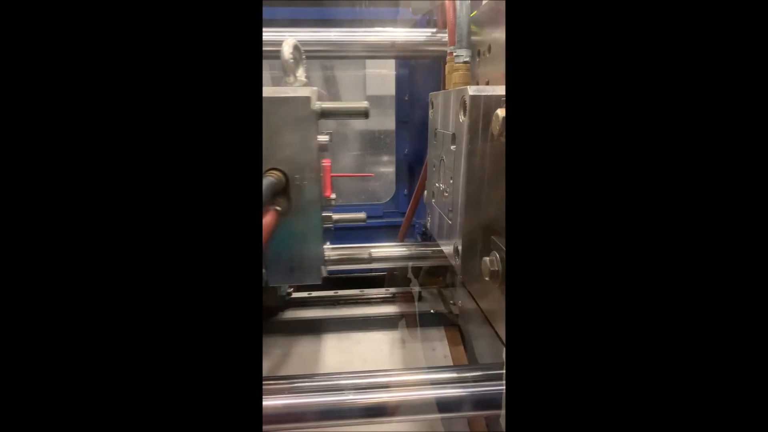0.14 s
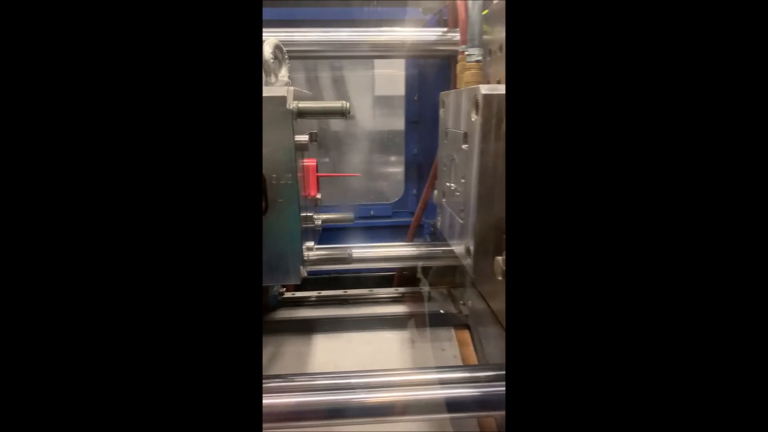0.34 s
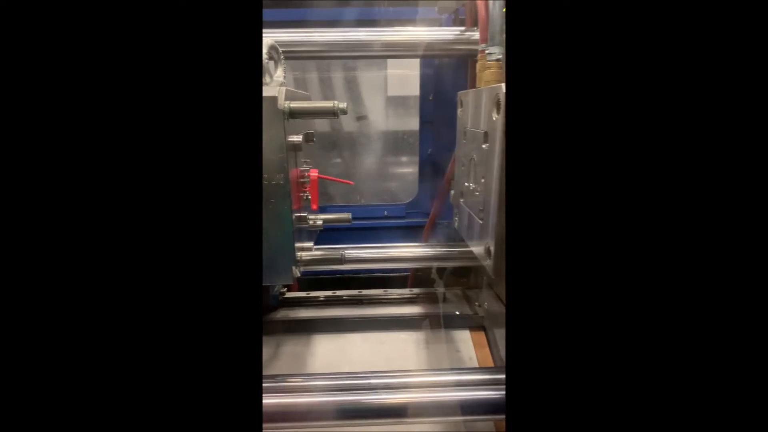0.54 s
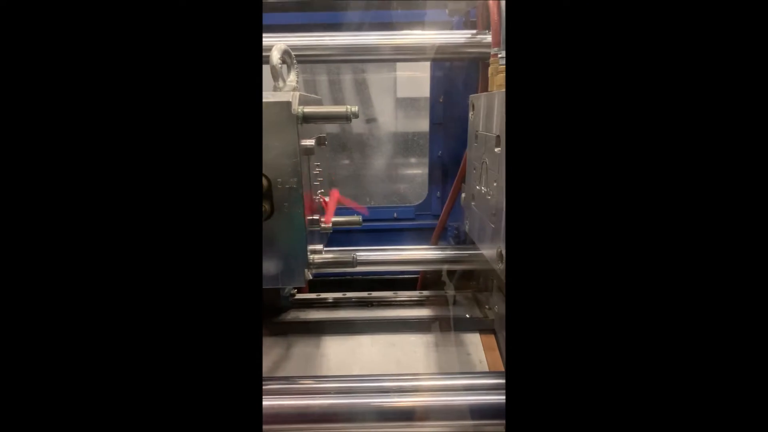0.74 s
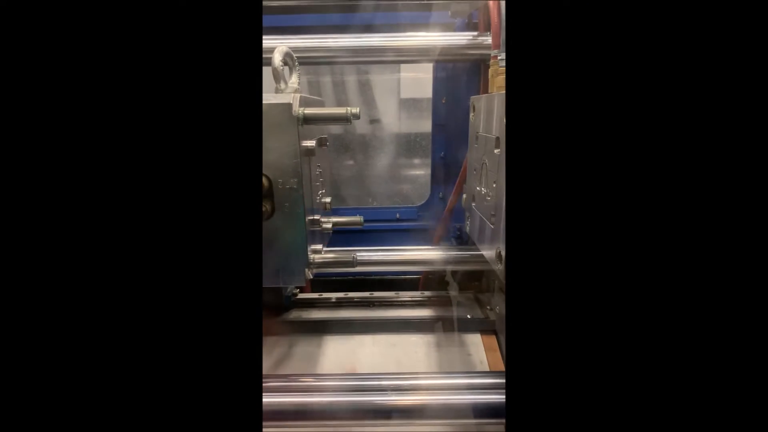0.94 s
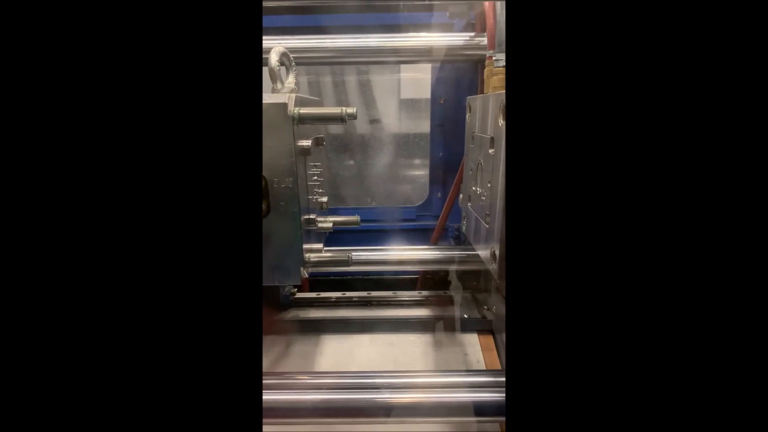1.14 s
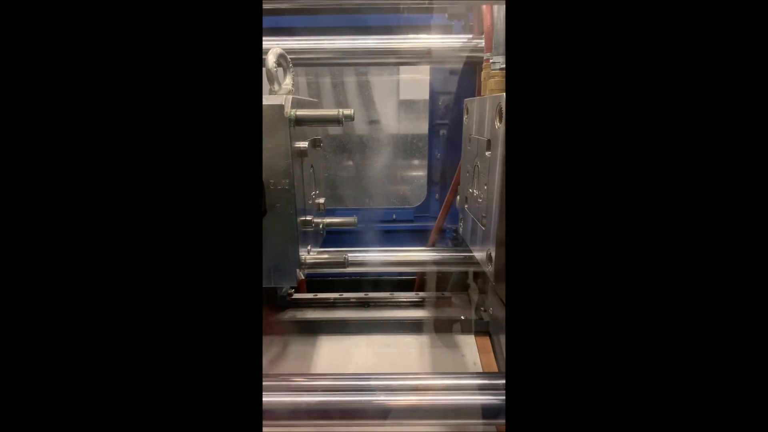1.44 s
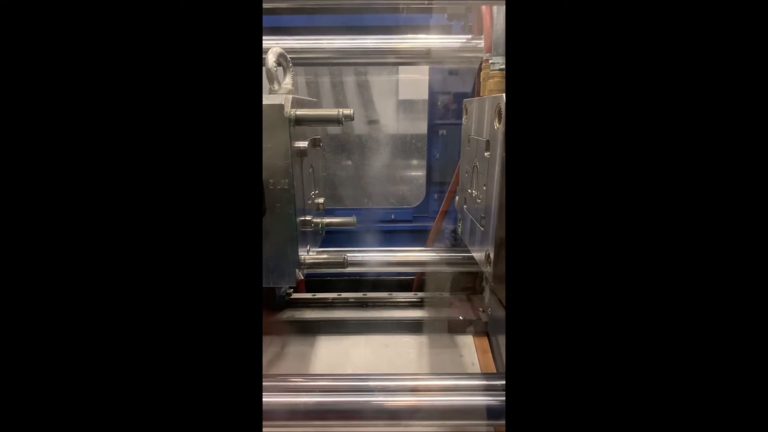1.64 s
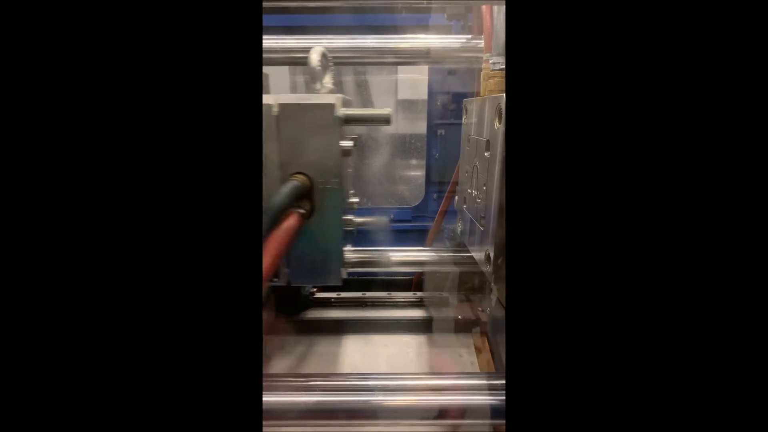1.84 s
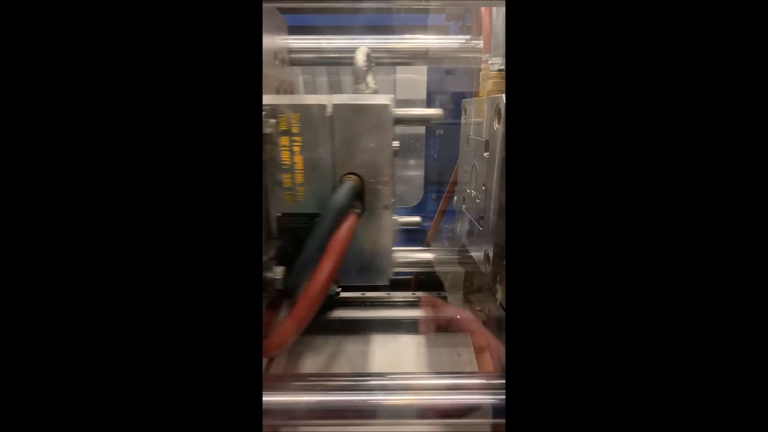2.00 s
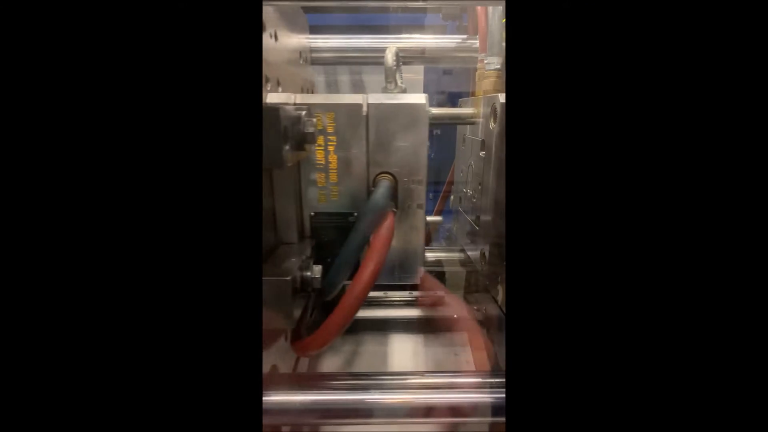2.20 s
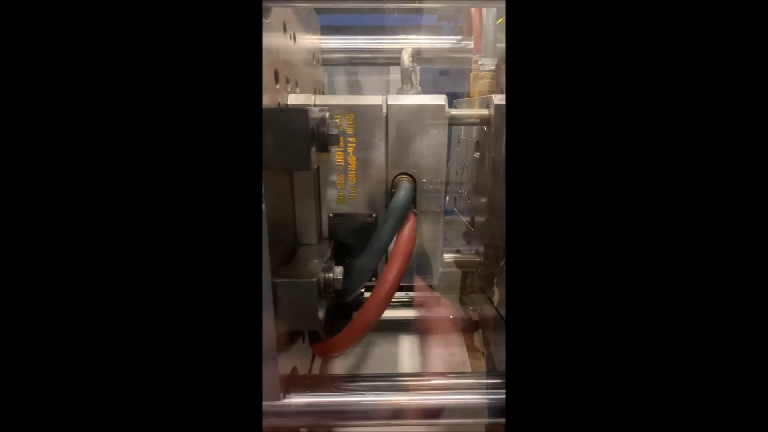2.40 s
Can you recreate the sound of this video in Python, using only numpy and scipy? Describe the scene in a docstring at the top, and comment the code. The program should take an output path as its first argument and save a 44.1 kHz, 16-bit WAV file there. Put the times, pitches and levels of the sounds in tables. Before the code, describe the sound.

Close stereo sound from just outside the guard: steady hydraulic hum, rumble and high beating whine, a few isolated metallic knocks, light rattling, then a dense run of hard clacks and ticks, ending in dull thumps.

```python
"""An injection moulding machine on a factory floor, heard in stereo from just outside its guard.
Throughout, pump and shaft sines hum, overtones whine and beat, and noise bands make rumble, oil flow and hiss.
First the open mould, its part ejected, knocks once: clicks ring its modes and a dense crack of noise.
More knocks follow with a light rattle of noise grains, then the clamp takes up its slack in a quick run
of steel clacks, pin ticks and short swelling notes, and slides shut with a few dull knocks."""
import sys
import numpy as np
from scipy import signal
from scipy.fft import rfft, irfft, next_fast_len
from scipy.io import wavfile

SR = 44100
rng = np.random.default_rng(int(sys.argv[2]) if len(sys.argv) > 2 else 0)


def store_pcm(level_fs):
    """Save levels as 16-bit WAV."""
    pcm = np.round(np.clip(level_fs, -1, 1) * 32767).astype(np.int16)
    wavfile.write(sys.argv[1], SR, np.atleast_2d(pcm).T)


N = 112896
TIME = np.arange(N) / SR  # seconds


def from_db(db):
    """Turn decibels into an amplitude gain."""
    return 10 ** (np.asarray(db) / 20)


def in_time(rows):
    """Draw each column of a table as straight lines between its times."""
    seconds, *columns = np.transpose(rows)
    return [np.interp(TIME, seconds, column) for column in columns]


def at_hz(points, hz):
    """Read a spectrum on a log-frequency axis."""
    point_hz, value = np.transpose(points)
    return np.interp(np.log(hz), np.log(point_hz), value)


def blend(zones_hz, columns, hz):
    """Crossfade the columns of neighbouring frequency zones on a log-frequency axis."""
    total = 0
    for one_zone, column in zip(np.eye(len(columns)), columns):
        weight = np.interp(np.log(hz), np.log(zones_hz), one_zone)
        total = total + weight * column
    return total


def drift(rate_hz):
    """Slow random wander of spread 1: noise through two equal low-pass poles, one step per 100 samples."""
    pole = np.exp(-200 * np.pi * rate_hz / SR)
    steps = rng.standard_normal(N // 100 + 1002)
    slow = signal.lfilter([1], [1, -2 * pole, pole * pole], steps)[1000:]  # drop the filter's start
    slow = (slow - slow.mean()) / slow.std()
    return np.interp(np.arange(N) / 100, np.arange(len(slow)), slow)


def bandpass(x, edges_hz):
    """Keep only what lies between two band edges."""
    return signal.sosfilt(signal.butter(2, edges_hz, "band", fs=SR, output="sos"), x)


def clicks(seconds, heights):
    """Place single-sample impulses at the given times."""
    out = np.full(N, 1e-18)
    np.add.at(out, (seconds * SR).astype(int), heights)
    return out


def ring(x, hz, t60):
    """A damped resonance: a unit click starts a sine of height 1 that falls 60 dB in t60 seconds."""
    radius = from_db(-60 / (t60 * SR))
    angle = 2 * np.pi * hz / SR
    return signal.lfilter([0, np.sin(angle)], [1, -2 * radius * np.cos(angle), radius * radius], x)


def fade(power, t60):
    """Energy that falls 60 dB in t60 seconds after each impulse of power."""
    return signal.lfilter([1], [1, -from_db(-120 / (t60 * SR))], power)


def swell(start, hz, db, rise):
    """A sine whose envelope peaks after its rise time and then dies away."""
    age = np.maximum(TIME - start, 0)
    envelope = (age / rise * np.exp(1 - age / rise)) ** 2
    return from_db(db) * envelope * np.sin(2 * np.pi * hz * age)


def tone(hz, db, lead, wander):
    """A stereo sine of given RMS level; its phase wanders and the left leads by some radians."""
    phase = 2 * np.pi * (hz * TIME + rng.random()) + wander * drift(1.56)
    return np.sqrt(2) * from_db(db) * np.sin([phase + lead, phase])


# How alike the noise is at left and right. Each row: frequency in Hz, correlation from 0 to 1.
LIKENESS = [(60, .997), (180, .993), (380, .8), (560, .8), (900, .45), (1700, .5), (2700, .15), (3700, .78),
            (6000, .85), (15000, .82)]


def noise_bands():
    """Third-octave bands of partly shared left-right noise at 0 dB per Hz, with their centres."""
    edges = 22 * 2 ** (np.arange(30) / 3)  # Hz
    white = rng.standard_normal((2, 2, N + 8000)) * np.sqrt(SR / 4)
    for k, band_edges in enumerate(zip(edges, edges[1:])):
        # neighbouring bands take turns on two independent noises
        mid, side = bandpass(white[k % 2], band_edges)[:, -N:]
        centre_hz = np.sqrt(np.prod(band_edges))
        alike = np.clip(at_hz(LIKENESS, centre_hz), 0, 1)
        yield centre_hz, np.sqrt(1 + alike) * mid + np.sqrt(1 - alike) * side * [[1], [-1]]


# Contacts of the mould. Each row: start in seconds, then relative levels of thud, body, clank and tick in dB.
KNOCKS = [(.371, -34, -19, -43, -53), (1.0942, -34, -25.5, -29, -61), (1.0987, -35, -35, -24, -58),
          (1.106, -43, -24, -36, -55), (1.118, -28, -26, -38, -50), (1.297, -45, -40, -24, -42),
          (1.451, -48, -52, -22, -31), (1.455, -46, -40, -28, -34), (1.506, -48, -34, -30, -45),
          (1.517, -52, -42, -28, -35), (1.526, -52, -39, -23, -38), (1.549, -50, -44, -26, -40),
          (1.585, -35, -28, -22.5, -43), (1.595, -24, -25.5, -26, -57), (1.624, -45, -40, -23.5, -48),
          (1.660, -44, -26, -38, -39), (1.731, -45, -42, -36, -24), (1.734, -42, -24, -17, -38),
          (1.738, -36, -16, -20, -32), (1.746, -15, -16.5, -12.5, -18), (1.752, -18.5, -16.5, -37, -31),
          (1.758, -27, -22.5, -27, -26), (1.7624, -17.5, -23, -22, -30), (1.77, -28, -14, -35, -40),
          (1.7726, -41, -20, -24, -22.5), (1.7751, -25, -17.5, -28, -37), (1.834, -26, -27.5, -28, -46),
          (1.8401, -26, -34, -24, -29), (1.8431, -29, -23.5, -29, -27), (1.866, -25, -34, -36, -29),
          (1.8881, -35, -21.5, -21, -47), (1.905, -17, -35, -32, -49), (1.936, -41, -28, -35, -41),
          (1.975, -39, -29, -26, -35), (2.108, -36, -32, -22.5, -59)]
# Where those four levels apply: centres in Hz.
KNOCK_ZONES_HZ = [200, 550, 1700, 7000]
# Modes of the mould and its frame. Each row: frequency in Hz, relative level in dB, 60 dB decay in seconds.
MODES = [(129, -7, 0.076), (206, -6.5, 0.11), (300.6, -6, 0.096), (416, -2.5, 0.027), (508.3, -4, 0.066),
         (676, -3, 0.048), (828, -15.5, 0.042), (1054, -18, 0.079), (1320, -7, 0.022), (1610, -11, 0.027),
         (1910, -14, 0.033), (2078, -15, 0.029), (3340, -17, 0.033), (5370, -0.5, 0.0065),
         (6340, -10, 0.038)]


def mould_modes():
    """Each contact strikes every mode of the steel, which rings as a decaying sine."""
    seconds, *levels = np.transpose(KNOCKS)
    out = np.zeros(N)
    for hz, mode_db, t60 in MODES:
        strike_db = mode_db + blend(KNOCK_ZONES_HZ, levels, hz) + rng.normal(0, 0.4, len(seconds))
        out += ring(clicks(seconds, from_db(strike_db)), hz, t60)
    return out


# Dense ringing of the struck steel. Each row: frequency in Hz, relative level in dB per Hz.
CRACK = [(100, -80), (400, -25), (1000, -43), (2200, -42.5), (4000, -40), (6000, -53), (11000, -46.5),
         (15500, -56)]
CRACK_T60_S, CRACK_SHORTENING = 0.059, 0.44  # decay at 1 kHz; power by which higher bands die sooner
TAIL_DB, TAIL_T60_S = -17.5, 0.19  # the hall, relative to the crack


def mould_crack():
    """Modes too dense to tell apart sound as a short noise burst, with a faint tail from the hall."""
    seconds, *levels = np.transpose(KNOCKS)
    lowest_hz = CRACK[0][0]
    out = np.zeros((2, N))
    for hz, band in noise_bands():
        if hz <= lowest_hz:
            continue
        power = clicks(seconds, from_db(blend(KNOCK_ZONES_HZ, levels, hz)) ** 2)
        crack = fade(power, CRACK_T60_S / (hz / 1000) ** CRACK_SHORTENING)
        tail = from_db(TAIL_DB) ** 2 * fade(power, TAIL_T60_S)
        out += band * from_db(at_hz(CRACK, hz)) * np.sqrt(crack + tail)
    return out


# Dull thumps of the frame as the clamp starts and brakes.
# Each row: start in seconds, frequency in Hz, peak in dB.
THUMPS = [(1.113, 246, -21.5), (1.760, 135, -28), (1.812, 82.5, -16), (1.834, 195, -21),
          (1.972, 198, -14.5), (2.104, 258, -17), (2.245, 85, -20)]
THUMP_RISE_S = 0.0062
# Steel parts meet, each with one short note. Each row: start in seconds, frequency in Hz, peak in dB,
# rise in seconds.
CLINKS = [(1.0928, 1380, -25.5, 0.0014), (1.092, 2390, -33.5, 0.0019), (1.0957, 1120, -29, 0.0025),
          (1.093, 533, -24, 0.0022), (1.4504, 3090, -31, 0.0012), (1.517, 2220, -34, 0.003),
          (1.526, 1980, -33, 0.0021), (1.731, 2520, -30, 0.0027), (1.732, 1382, -19, 0.0069),
          (1.7454, 5650, -17.5, 0.001), (1.7615, 2140, -21.5, 0.0012), (1.770, 810, -33, .004),
          (1.773, 1644, -21.5, 0.0023), (1.8422, 2450, -29, 0.0011)]


def clamp():
    """Frame and steel parts each sound one note that builds up briefly and dies away."""
    thumps = sum(swell(start, hz, db, THUMP_RISE_S) for start, hz, db in THUMPS)
    clinks = sum(swell(start, hz, db, rise) for start, hz, db, rise in CLINKS)
    return thumps + clinks


# The pins tick as the clamp jolts them. Each row: start in seconds, relative level in dB.
TICKS = [(1.741, -34), (1.7493, -22), (1.7583, -29), (1.7625, -33), (1.7694, -34), (1.772, -27),
         (1.8345, -34), (1.8407, -22), (1.8437, -24), (1.858, -36), (1.8642, -29), (1.8893, -30),
         (1.933, -33), (1.9735, -33)]
# Modes of the loose pins. Each row: frequency in Hz, relative level in dB, 60 dB decay in seconds.
PIN_MODES = [(10360, -6.5, 0.0083), (11360, -6, 0.0077), (12200, -10, 0.0074), (14300, -7, .008),
             (15200, -11, .008)]


def pins():
    """Loose pins tick against their guides and ring very high and short."""
    seconds, tick_db = np.transpose(TICKS)
    out = np.zeros(N)
    for hz, mode_db, t60 in PIN_MODES:
        strike_db = tick_db + mode_db + rng.normal(0, 2.2, len(seconds))
        out += ring(clicks(seconds, from_db(strike_db)), hz, t60)
    return out


# Light rattle of the sliding mould. Each row: time in seconds, relative level of the contacts in dB.
SLIDE = [(0, -62), (1.2, -41), (1.5, -27), (1.7, -34), (1.95, -35), (2.2, -39), (2.56, -36)]
RATTLES_PER_S, RATTLE_HZ, RATTLE_OCTAVES = 70, 1880, 0.51  # mean rate; band centre; half its width


def rattle():
    """Small random contacts of loose parts, as ejector and mould move, set off fading grains of noise."""
    slide_db, = in_time(SLIDE)
    hits = rng.random(N) < RATTLES_PER_S / SR
    power = hits * from_db(slide_db + 1.5 * rng.standard_normal(N)) ** 2 + 1e-18
    grit = rng.standard_normal((2, N)) * np.sqrt(fade(power, t60=0.036))
    edges_hz = RATTLE_HZ * 2 ** (RATTLE_OCTAVES * np.array([-1, 1]))
    return from_db(5.5) * bandpass(grit, edges_hz)


# The strongest pump tones: frequencies in Hz.
PUMP_HZ = [199.2, 238.8, 597.6]
# Their mean levels. Each row: time in seconds, then one RMS level in dB for each of the three tones.
PUMP_LEVELS = [(0, -35, -32.5, -37.5), (.3, -35.5, -37, -38), (.7, -40, -40.5, -36.5), (1.0, -45, -44, -36),
               (1.35, -45, -38.5, -38), (1.65, -42, -38, -37), (1.95, -37, -34.5, -38.5),
               (2.25, -36, -34, -40.5), (2.56, -35, -35, -38.5)]
# Weaker tones of the drive. Each row: multiple of the shaft rate (rounded to a whole number when played),
# mean RMS level in dB, lead of the left side in radians per kHz, waver in dB (its sign does not matter).
HUM = [(3, -41.5, -0.5, 3), (5, -45, -1.5, 5.5), (19, -44.5, 2.5, 2.5), (21, -46, 2, 4), (24, -47, 2, 3.5),
       (25, -44, -0.2, 1.5), (40, -48.5, 1.53, 4), (48, -52, -0.5, 1), (50, -41.5, 1.5, 0.9),
       (60, -50, 1.67, 3.5), (72.53, -51.5, 0.68, 2.5), (90.25, -57.5, 0.5, -2.5), (110.3, -60, 1.3, 5),
       (164, -56, -1.5, 2.5), (181.5, -61, 4, 5)]
SHAFT_HZ = 19.92


def hum():
    """Motor and pumps sound wavering sines, the weaker ones at whole multiples of the shaft rate."""
    out = np.zeros((2, N))
    for hz, db in zip(PUMP_HZ, in_time(PUMP_LEVELS)):
        out += tone(hz, db + 1.84 * drift(7.9), lead=0.027, wander=0.266)
    for multiple, db, lead_per_khz, waver_db in HUM:
        hz = np.round(multiple) * SHAFT_HZ
        lead = lead_per_khz * hz / 1000
        out += tone(hz, db + waver_db * drift(4.7), lead, wander=0.16 * waver_db)
    return out


# Two pumps at nearly the same speed: base rates of their overtones in Hz.
WHINE_RATES_HZ = [238.6, 239.07]
# Overtones of the first pump. Each row: frequency in Hz, mean peak level of each overtone in dB.
WHINE = [(3000, -58), (5900, -59.5), (6200, -86), (6440, -58.5), (6700, -62), (7650, -69.5), (8110, -54),
         (8350, -55), (8590, -57), (9050, -55), (9300, -81), (9780, -56.5), (10020, -60.5), (10500, -65),
         (11200, -71), (13100, -77), (14080, -65), (14316, -60), (14600, -65), (15800, -73)]
# Overtones of the second pump. Each row: frequency in Hz, mean peak level of each overtone in dB.
SECOND_WHINE = [(3000, -83), (5800, -64), (6500, -57.5), (6930, -57), (7200, -58.5), (8600, -65),
                (10000, -61.5), (12000, -70.5), (15800, -73)]
WHINE_SCATTER_DB, WHINE_WAVER_DB = 0.5, 2.8  # chance per overtone; slow wander in time


def whine():
    """High overtones of two pumps, slightly apart in pitch, beat against each other."""
    out = np.zeros(N)
    for rate, spectrum in zip(WHINE_RATES_HZ, (WHINE, SECOND_WHINE)):
        turns = rate * TIME + 0.0038 * drift(0.81)
        for k in range(13, 67):
            db = at_hz(spectrum, k * rate) + WHINE_SCATTER_DB * rng.normal() + WHINE_WAVER_DB * drift(4.0)
            out += from_db(db) * np.sin(2 * np.pi * (k * turns + rng.random()))
    return out


WHISTLE_HZ, WHISTLE_DB, WHISTLE_FADE_DB_PER_S = 2499, -50, 0.5


def whistle():
    """A thin whistle of the drive: one wavering sine that slowly fades."""
    db = WHISTLE_DB - WHISTLE_FADE_DB_PER_S * TIME + 3 * drift(3)
    return tone(WHISTLE_HZ, db, lead=2.5, wander=0.23)


# Spectrum of the factory noise. Each row: frequency in Hz, relative level in dB per Hz.
NOISE = [(25, -84), (38, -58.5), (54, -52.5), (75, -53), (150, -58), (280, -55.5), (400, -59.5), (520, -61),
         (650, -66.5), (850, -72.5), (1100, -68), (1450, -73), (2000, -76), (2600, -88), (3400, -72.5),
         (5000, -87.5), (7000, -78.5), (9000, -88.5), (12000, -86), (15500, -98.5)]
# Its course. Each row: time in seconds, then offsets of rumble, oil flow, upper middle and hiss in dB.
NOISE_LEVELS = [(0, -1, 2, -1.5, -1), (.35, -4.5, 1.5, -1, 0), (.75, -1, 0.5, -0.5, -1),
                (1.13, -2.5, 0.5, 0, 1.5), (1.35, -1.5, -1, -2.5, 0), (1.65, -1.5, 2, -1.5, 1),
                (1.86, -3.5, 3.5, 0, 1.5), (2.05, -4, 1.5, -0.5, -1), (2.3, 1, 0, -0.5, -0.5),
                (2.56, -6, -2.5, 0, -1)]
# Where those four offsets apply: centres in Hz.
NOISE_ZONES_HZ = [150, 500, 1800, 7000]
FLICKER_DB = 1.5


def factory():
    """Rumble, oil flow and hiss as noise bands, each flickering a little on its own."""
    levels = in_time(NOISE_LEVELS)
    out = np.zeros((2, N))
    for hz, band in noise_bands():
        db = at_hz(NOISE, hz) + blend(NOISE_ZONES_HZ, levels, hz) + FLICKER_DB * drift(16.0)
        out += band * from_db(db)
    return out


def scene():
    """The machine from just outside its guard, with the factory floor around it."""
    contacts = mould_modes() + mould_crack() + clamp() + pins() + rattle()
    drive = hum() + whine() + whistle()
    return contacts + drive + factory()


# The right microphone port favours the middle range. Each row: frequency in Hz, right over left in dB.
RIGHT_PORT = [(180, 0), (350, 1.4), (600, 1.6), (1100, 1.3), (1800, 0)]
PORT_LAG_S, PORT_ONSET_HZ = .0002326, 2450  # the right port lags above this frequency
CUTOFF_HZ = 15780


def record(dry):
    """The right port favours the middle range and gets the treble later; deep bass and top are cut."""
    size = next_fast_len(N + SR)
    hz = np.arange(size // 2 + 1) * SR / size
    lag = np.exp(-2j * np.pi * PORT_LAG_S * np.maximum(hz - PORT_ONSET_HZ, 0))
    lean = from_db(at_hz(RIGHT_PORT, hz + 1) / 2)  # half the difference on each side
    responses = np.array([1 / lean, lag * lean])
    ports = irfft(rfft(dry, size) * responses, size)[:, :N]
    ports = signal.sosfilt(signal.butter(4, 44, "high", fs=SR, output="sos"), ports)
    return signal.sosfilt(signal.ellip(12, .1, 80, CUTOFF_HZ, fs=SR, output="sos"), ports)


dry = scene()
out = record(dry)
store_pcm(out)
```